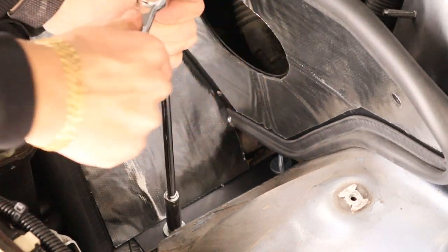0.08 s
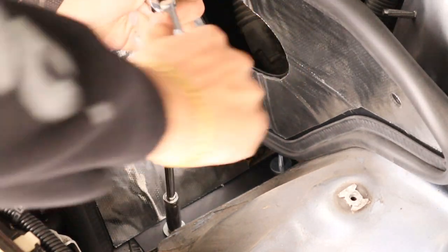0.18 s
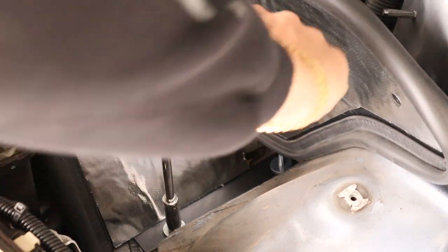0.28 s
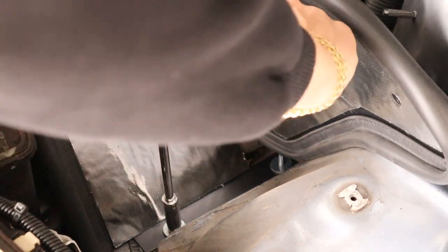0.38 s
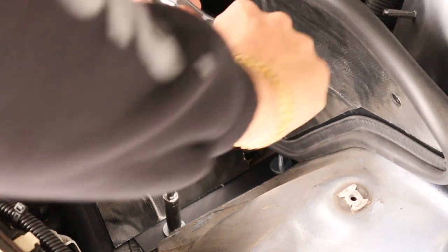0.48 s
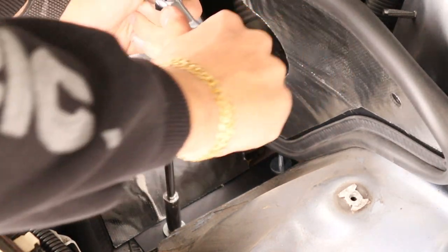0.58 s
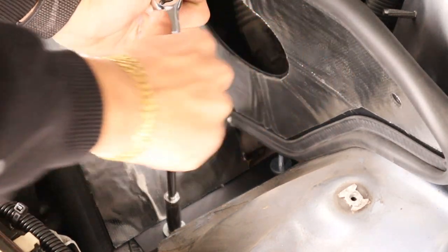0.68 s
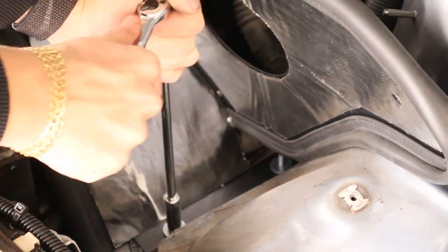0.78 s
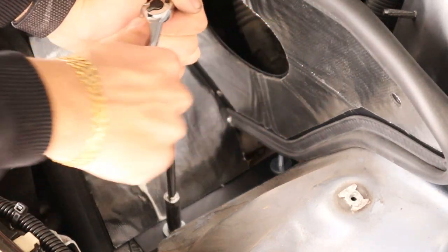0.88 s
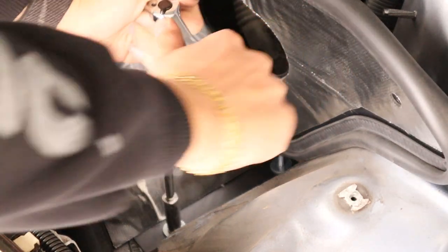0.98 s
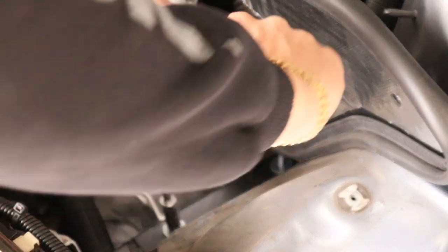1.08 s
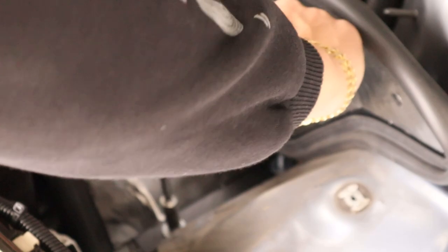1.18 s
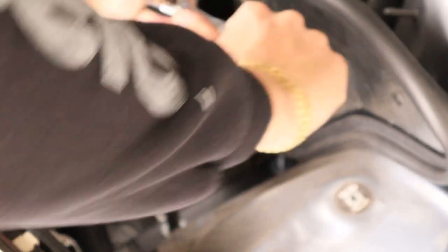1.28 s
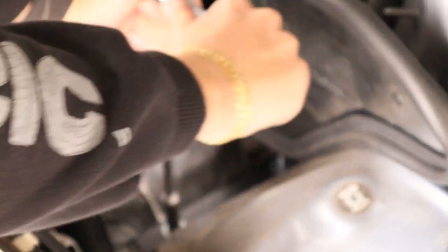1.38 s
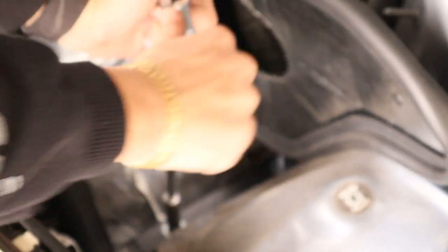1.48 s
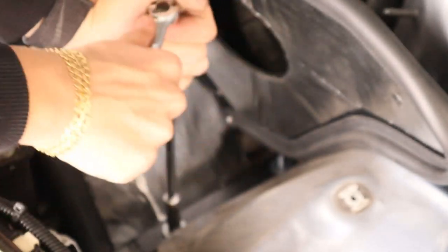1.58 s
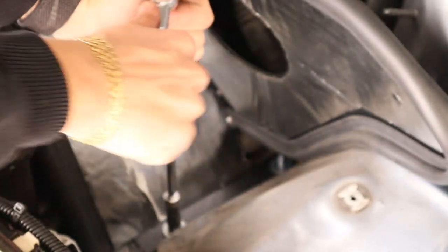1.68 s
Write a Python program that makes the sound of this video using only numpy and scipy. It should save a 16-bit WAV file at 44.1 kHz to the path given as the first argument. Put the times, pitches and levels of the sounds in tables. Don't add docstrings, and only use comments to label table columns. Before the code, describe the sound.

Ratchet handle knocks metal with a brief rattle, then its pawl snaps in two rapid bursts that slow at the end, with soft hand thuds and faint sleeve rustle, recorded close in a quiet garage.

```python
import sys
import numpy as np
from scipy import signal
from scipy.fft import rfft, irfft
from scipy.io import wavfile
from scipy.ndimage import uniform_filter1d

SR = 44100
rng = np.random.default_rng(int(sys.argv[2]) if len(sys.argv) > 2 else 0)


def invert_db(level):
    return 10 ** (np.asarray(level, dtype=float) / 20)


def store_wav(level_fs):
    pcm = np.round(np.clip(np.atleast_2d(level_fs), -1, 1) * 32767)
    wavfile.write(sys.argv[1], SR, pcm.T.astype(np.int16))


N = 77175
BAR_HZ = 572


def rms_one(x):
    return x / np.sqrt(np.mean(x ** 2) + 1e-20)


def peak_one(x, size):
    return x / np.sqrt(np.max(uniform_filter1d(x ** 2, size=size)))


def low_pass(x, hz, order=2):
    return signal.sosfilt(signal.butter(order, hz, fs=SR, output="sos"), x)


def coloured(x, points):
    hz, db = np.transpose(points)
    f = np.maximum(np.fft.rfftfreq(len(x), 1 / SR), 1)
    gain = invert_db(np.interp(np.log(f), np.log(hz), db))
    return irfft(rfft(x) * rms_one(gain), len(x))


def resonance(x, hz, width_hz):
    r = np.exp(-np.pi * width_hz / SR)
    poles = [1, -2 * r * np.cos(2 * np.pi * hz / SR), r * r]
    return signal.lfilter([1, 0, -1], poles, x) * np.sqrt((1 - r * r) / 2)


def burst(rise_s, fall_s, tail_s=0.01, tail_db=-60):
    t = np.arange(SR // 4) / SR
    fall = np.exp(-t / fall_s) + invert_db(tail_db) * np.exp(-t / tail_s)
    return (1 - np.exp(-t / rise_s)) ** 2 * fall


def flutter(size):
    return rms_one(uniform_filter1d(rng.standard_normal(N), size=size))


def add(out, s, sound):
    i = int(s * SR)
    out[i:i + len(sound)] += sound[:N - i]


# pitch_hz, width_hz, level_db
HEAD_RINGS = [(3200, 110, -3), (4090, 290, -7.5), (4800, 40, -15.5), (5120, 470, -0.5), (5890, 91, -3),
              (7200, 200, 3.5), (8333, 110, 3), (10550, 56, -10.5), (11150, 280, -8.5), (11850, 190, 0),
              (13100, 140, -1.5)]
# frequency_hz, level_db (per Hz)
CLICK_SPECTRUM = [(880, -68), (1500, -14), (1620, -5), (2100, -10.5), (5120, -6.5), (10600, -15),
                  (13400, -22), (15800, -16)]
# time_s, treble_db, stretch (factor on fall time)
HEAD_SWING = [(.27, 3.5, 0.97), (.31, 4.5, 1.3), (.375, -8, 1.24), (.45, -12, 1.5), (.56, -10, 1.3),
              (1.03, 3, 1.3), (1.08, 7, 1.4), (1.14, 5, 1.55), (1.22, 9.5, 1.4), (1.26, -28, 1.6),
              (1.36, 4.5, 1.05)]


def click(hz, s):
    rise_s, fall_s, tail_s, tail_db = 0.0012, 0.0012, 0.01, -15
    bright_db, bright_width_hz, head_db = -4, 780, -4
    spread_db, damping_hz = 4, 200
    when, treble, stretches = np.transpose(HEAD_SWING)
    treble_db, stretch = np.interp(s, when, treble), np.interp(s, when, stretches)

    snap_noise, tail_noise = rng.standard_normal((2, SR // 4))
    chatter = burst(rise_s, fall_s * stretch) * snap_noise
    chatter += invert_db(tail_db) * burst(rise_s, tail_s) * low_pass(tail_noise, 6000, order=1)
    rings = 0
    for ring_hz, width_hz, db in HEAD_RINGS:
        level = invert_db(db + spread_db * rng.standard_normal() - 11.5)
        rings = rings + level * resonance(chatter, ring_hz, width_hz + damping_hz)
    sound = coloured(chatter, CLICK_SPECTRUM)
    sound = sound + invert_db(bright_db) * resonance(chatter, hz, bright_width_hz) + invert_db(head_db) * rings

    dull = low_pass(sound, 9370, order=1)
    return dull + invert_db(treble_db) * (sound - dull)


# start_s, peak_db, pitch_hz (brightest ring), jolt_db, bar_hz (favoured mode)
FIRST_STROKE = [(0.276, -27, 7950, -65, 595), (0.2886, -29, 7800, -38.5, 800),
                (0.3013, -30.5, 5800, -33.5, 900), (0.3131, -25, 4670, -35.5, 487),
                (0.3253, -25.5, 4430, -44, 1270), (0.3403, -27.5, 4090, -46, 770),
                (0.3552, -28.5, 5400, -39, 534), (0.3743, -28, 3800, -35, 540),
                (0.399, -27.5, 4500, -43.5, 483), (0.4483, -29.5, 3540, -38.5, 527)]
SECOND_STROKE = [(1.035, -41, 5030, -47, 535), (1.0428, -44.5, 8500, -66, 571),
                 (1.0519, -29, 7900, -49.5, 523), (1.063, -26.5, 7700, -55, 580),
                 (1.0753, -29, 7500, -47, 690), (1.0856, -29, 4800, -59, 931),
                 (1.0974, -26.5, 7200, -48, 585), (1.1087, -28.5, 6600, -80, 581),
                 (1.1214, -26, 5100, -59, 552), (1.1383, -26, 5120, -45, 707),
                 (1.1552, -27.5, 8200, -56, 556), (1.1778, -28.5, 7400, -41.5, 780),
                 (1.1941, -28.5, 5200, -42, 767), (1.2164, -32.5, 3420, -45.5, 570),
                 (1.2532, -30.5, 5120, -43, 797), (1.3544, -28, 4950, -39.5, 560)]
# start_s, peak_db, pitch_hz (brightest ring), jolt_db
SLACK_TOUCHES = [(.5432, -35.5, 5640, -49), (.550, -34, 5470, -52.5), (0.563, -45, 3930, -47),
                 (.574, -34, 5050, -46.5), (.588, -44, 3400, -48.5), (0.988, -83, 2500, -48),
                 (1.017, -50, 3200, -56), (1.339, -44, 3260, -51.5)]
# start_s, peak_db
JOINT_TICKS = [
    (0.016, -63),
    (0.103, -60),
    (1.693, -81),
]


def pawl():
    out = np.zeros(N)
    clicks = [row[:3] for row in FIRST_STROKE + SECOND_STROKE]
    ticks = [(s, db, 9000) for s, db in JOINT_TICKS]
    for s, db, hz in clicks + ticks:
        add(out, s, invert_db(db - 8.5) * peak_one(click(hz, s), size=88))
    for s, db, hz, _ in SLACK_TOUCHES:
        touch = low_pass(click(hz, s), 4800, order=3)
        add(out, s, invert_db(db - 12.5) * peak_one(touch, size=88))
    return out


# start_s, level_db
SEAT_BUMPS = [(.533, -49), (.539, -54), (.557, -74), (.568, -62), (.5965, -60), (1.126, -43),
              (1.269, -49.5), (1.319, -46), (1.363, -44), (1.43, -59), (1.664, -63), (1.683, -60),
              (1.723, -62), (1.74, -63)]
# pitch_hz, level_db, t60_s
BODY_MODES = [(261, -13, 0.018), (413, -16, 0.04), (509, -13, 0.032), (560, 1.5, 0.039), (756, 2.5, 0.045),
              (837, -9.5, 0.23), (970, -16, 0.048), (1218, 3, 0.035), (1345, -9, 0.22), (1618, -2.5, 0.096),
              (1822, -8, 0.12), (2296, 0, 0.023)]


def body():
    jolt_s, lag_s, jolt_db = 0.0032, 0.001536, 4.5
    favour_db, favour_width_hz, seat_shift = 8.5, 59, 0.0085
    out, shape = np.zeros(N), burst(0.0003, jolt_s)
    jolts = []
    for row in FIRST_STROKE + SECOND_STROKE + SLACK_TOUCHES:
        favoured_hz = row[4] if len(row) > 4 else BAR_HZ
        jolts.append((row[0] + lag_s, row[3] + jolt_db, favoured_hz))
    jolts += [(s, db, BAR_HZ) for s, db in SEAT_BUMPS]

    for s, db, favoured_hz in jolts:
        damping = 1.36 if 0.5 < s < 0.62 else 1
        push = shape * rng.standard_normal(len(shape))
        ring = 0
        for hz, mode_db, t60_s in BODY_MODES:
            seat, strength = rng.standard_normal(2)
            width_hz = np.log(1000) / np.pi / t60_s * damping
            mode = resonance(resonance(push, hz, hz * 0.37), hz * (1 + seat_shift * seat), width_hz)
            extra_db = favour_db * np.exp(-((hz - favoured_hz) / favour_width_hz) ** 2)
            ring = ring + invert_db(mode_db + extra_db + 2 * strength) * peak_one(mode, size=220)
        add(out, s, invert_db(db - 7.5) * peak_one(low_pass(ring, 2370), size=220))
    return out


# start_s, crack_db
HANDLE_KNOCKS = [
    (.1990, -29.5),
    (0.2003, -18),
    (0.203, -21.5),
    (.217, -39),
]
# frequency_hz, level_db (per Hz)
KNOCK_SPECTRUM = [(1000, -22), (2300, -15.5), (3300, -8), (4200, -7), (5000, -2.5), (6000, -12),
                  (8000, -3.5), (16000, -28.5)]
# pitch_hz, level_db, t60_s
STRUCK_MODES = [(264, -10.5, 0.044), (433.3, -11.5, 0.065), (521.3, -5, 0.077), (584.4, 0, 0.056),
                (765.4, -3, .04), (841, -7, 0.046), (935, -10.5, 0.05), (1170, -3.5, 0.0504),
                (1406, -10, .04), (1654, -11, 0.056), (1864, -5, 0.052), (2279, -5, .03),
                (4760, -8.5, .012), (7780, -9, 0.027)]
# start_s, level_db
PANEL_DRUMS = [(.204, -37.5), (.53, -55.5), (1.0, -63.5), (1.08, -65), (1.353, -52.5)]


def knock():
    shape = burst(0.00032, 0.00067, tail_s=0.018, tail_db=-29)
    struck_s, struck_db, struck_rise_s, buzz_db = 0.1998, -15.5, 0.0018, 0.8
    drum_hz, drum_width_hz, drum_rise_s, drum_fall_s = 223, 415, 0.0043, 0.054
    out, t = np.zeros(N), np.arange(len(shape)) / SR
    for s, db in HANDLE_KNOCKS:
        crack = shape * coloured(rng.standard_normal(len(t)), KNOCK_SPECTRUM)
        add(out, s, invert_db(db) * peak_one(crack, size=88))

    for k, (hz, db, t60_s) in enumerate(STRUCK_MODES):
        buzz = buzz_db * flutter(size=300)[:len(t)]
        level = invert_db(struck_db + db - 60 * t / t60_s + buzz)
        rise = 1 - np.exp(-t * np.sqrt(hz / BAR_HZ) / struck_rise_s)
        sign = (-1) ** k
        add(out, struck_s, level * rise * np.sin(2 * np.pi * hz * t) * sign)

    for s, db in PANEL_DRUMS:
        rumble = resonance(rng.standard_normal(len(t)), drum_hz, drum_width_hz)
        rumble = resonance(rumble, drum_hz, drum_width_hz)
        add(out, s, invert_db(db) * rms_one(rumble) * burst(drum_rise_s, drum_fall_s))
    return out


# start_s, peak_db, pitch_hz
HAND_THUDS = [(0.5321, -47, 620), (.5895, -41.5, 710), (1.6625, -53, 770), (1.686, -62, 620),
              (1.724, -62, 396), (1.7385, -52, 635), (1.745, -59, 320)]


def thuds():
    rise_s, fall_cycles = 0.00035, 1.56
    out, t = np.zeros(N), np.arange(SR // 4) / SR
    for s, db, hz in HAND_THUDS:
        add(out, s, invert_db(db + 4.5) * burst(rise_s, fall_cycles / hz) * np.sin(2 * np.pi * hz * t))
    return out


# start_s, level_db
LOOSE_RATTLES = [
    (.206, -30),
    (1.356, -52),
]
# frequency_hz, level_db (per Hz)
RATTLE_SPECTRUM = [(70, -59.5), (250, -28), (450, 0), (900, -2), (1300, -8), (2300, -11.5), (5000, -20),
                   (9000, -37)]


def rattle():
    envelope = np.zeros(N)
    for s, db in LOOSE_RATTLES:
        add(envelope, s, invert_db(db) * burst(0.0027, 0.035))
    grain = invert_db(1.2 * flutter(size=180))
    return envelope * grain * coloured(rng.standard_normal(N), RATTLE_SPECTRUM)


# time_s, level_db
SLEEVE_LEVEL = [(0, -70), (0.169, -67), (.5, -59.5), (0.552, -54), (.6, -61.5), (.66, -66), (0.779, -78.5),
                (.85, -68), (0.919, -60.5), (.97, -75.5), (1.1, -56.5), (1.3, -63.5), (1.42, -65.5),
                (1.55, -69.5), (1.651, -74.5), (1.75, -83.5)]
# frequency_hz, level_db (per Hz)
SLEEVE_SPECTRUM = [(88, -50), (150, -19), (241, -2), (281, -17), (566, -2.5), (1980, -14), (5320, -19.5),
                   (14000, -46.5)]


def sleeve():
    s, db = np.transpose(SLEEVE_LEVEL)
    level_db = np.interp(np.arange(N) / SR, s, db) + 1.5 * flutter(size=200)
    return invert_db(level_db) * coloured(rng.standard_normal(N), SLEEVE_SPECTRUM)


def garage(x):
    t60_s, level_db, wall_cut_hz = 0.47, -14.5, 3300
    t = np.arange(SR) / SR
    tail = rng.standard_normal(SR) * invert_db(-60 * t / t60_s) * (1 - np.exp(-t / 0.0009))
    tail = low_pass(tail, wall_cut_hz, order=1)
    return invert_db(level_db) * signal.fftconvolve(x, tail / np.sqrt(np.sum(tail ** 2)))[:N]


# frequency_hz, level_db (per Hz)
AIR_SPECTRUM = [(22, -28), (42, 4.5), (384, 2), (489, -4), (1790, -12.5), (2050, -23), (8140, -19),
                (14800, -27), (16000, -35)]


def room_air():
    return invert_db(-69) * coloured(rng.standard_normal(N), AIR_SPECTRUM)


def scene():
    low_cut = signal.butter(3, 84, "high", fs=SR, output="sos")
    clicks = pawl()
    lows = signal.sosfilt(low_cut, body() + knock() + thuds())
    reverberation = garage(clicks + invert_db(-8) * lows)
    out = clicks + lows + rattle() + sleeve() + reverberation + room_air()
    return out[None]


def top_cut(x):
    return signal.sosfilt(signal.butter(12, 16780, fs=SR, output="sos"), x)


def record(dry):
    edge = signal.cheby2(20, 42, 15950, fs=SR, output="sos")
    mix = signal.sosfilt(edge, dry)
    return top_cut(mix)


dry = scene()
out = record(dry)
store_wav(out)
```